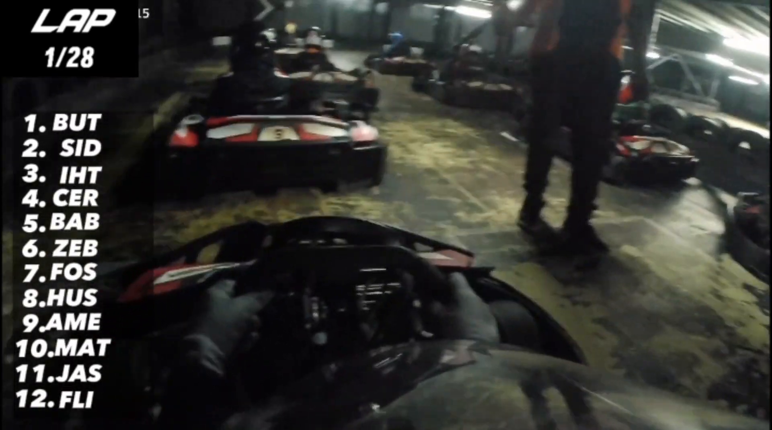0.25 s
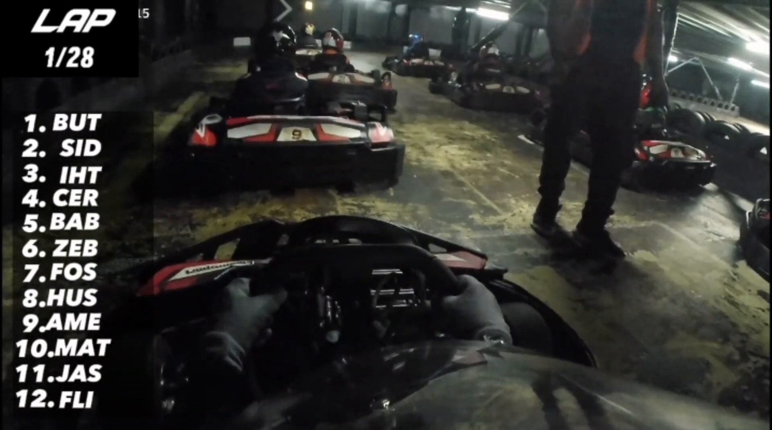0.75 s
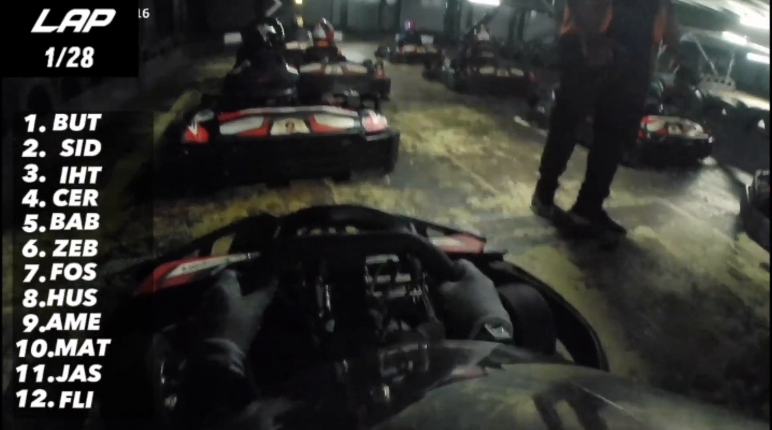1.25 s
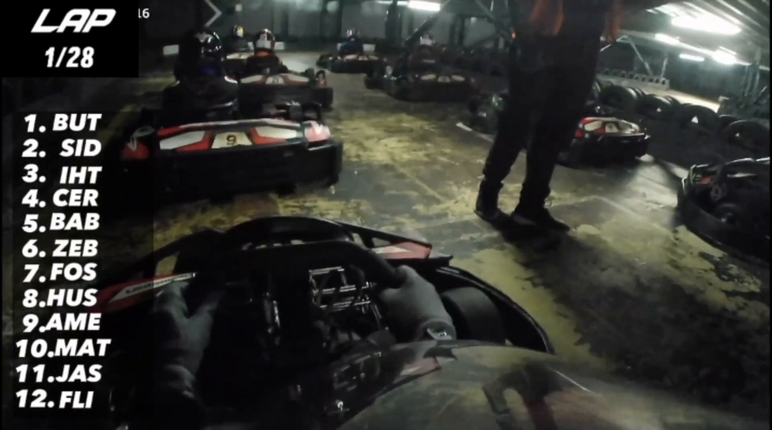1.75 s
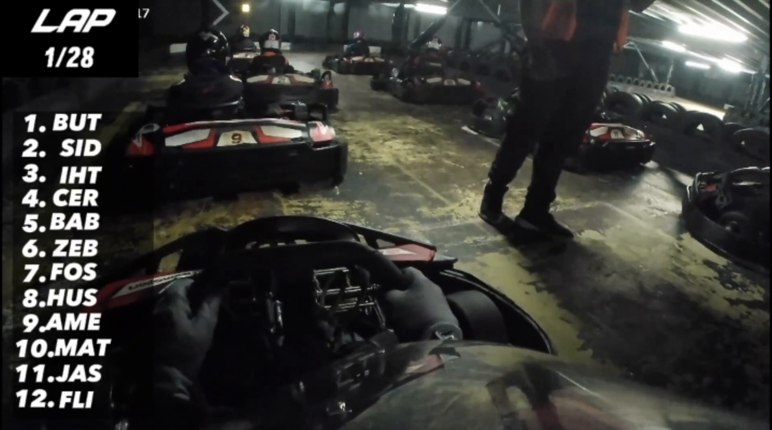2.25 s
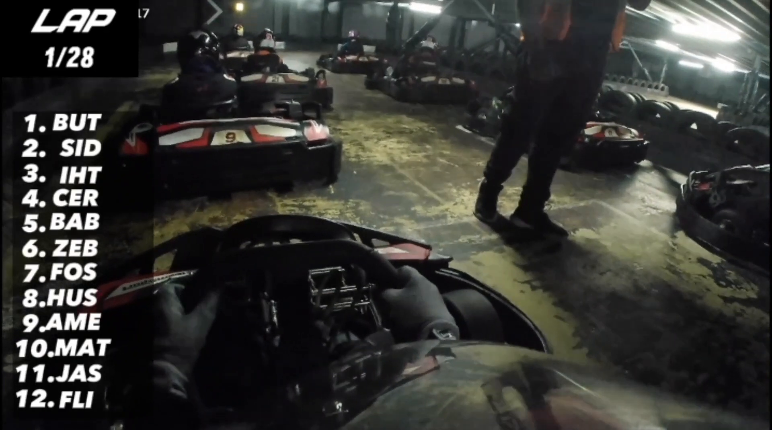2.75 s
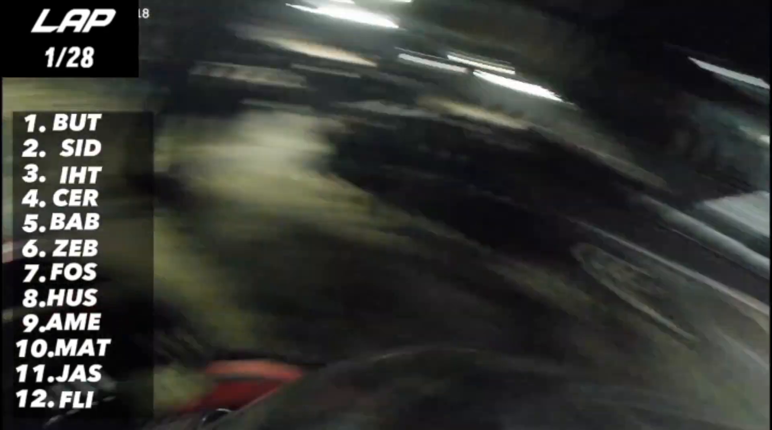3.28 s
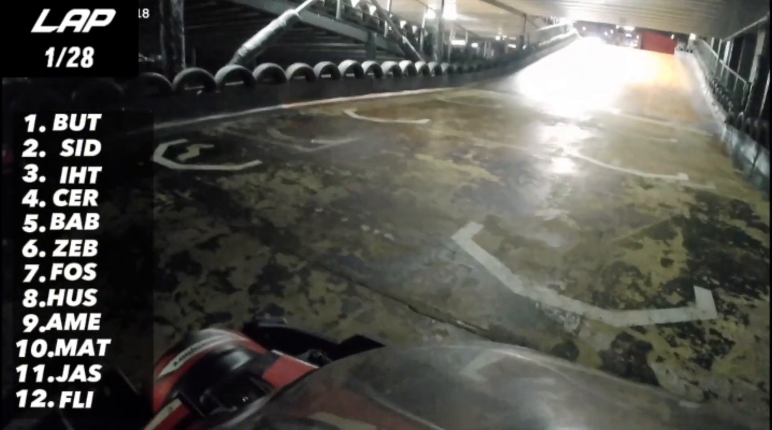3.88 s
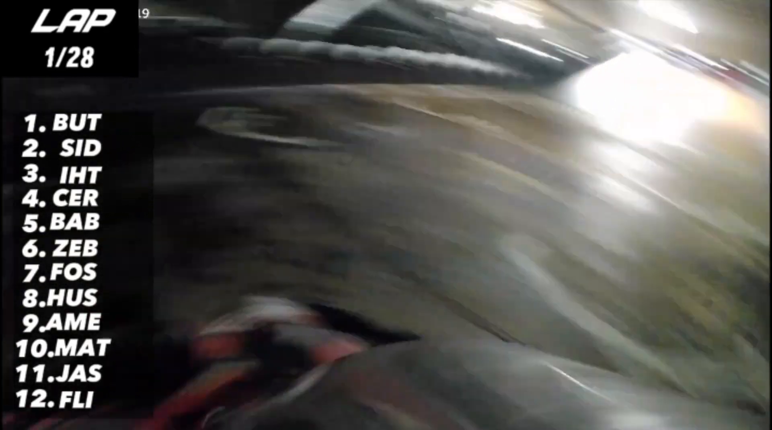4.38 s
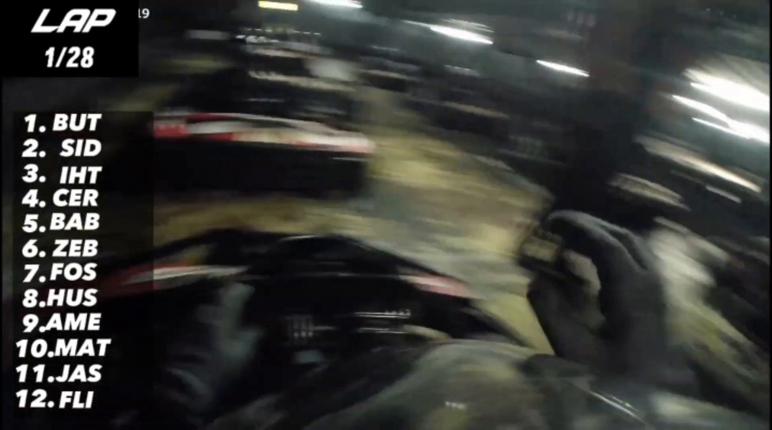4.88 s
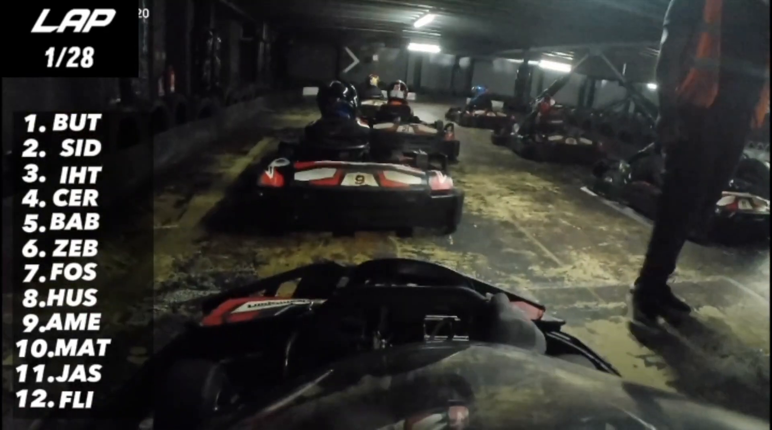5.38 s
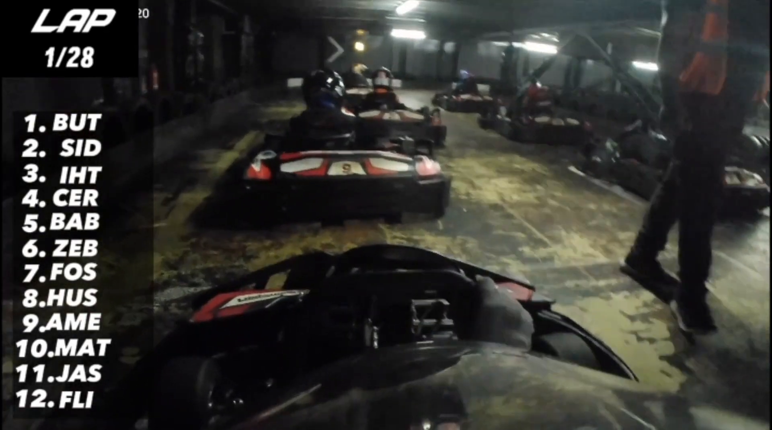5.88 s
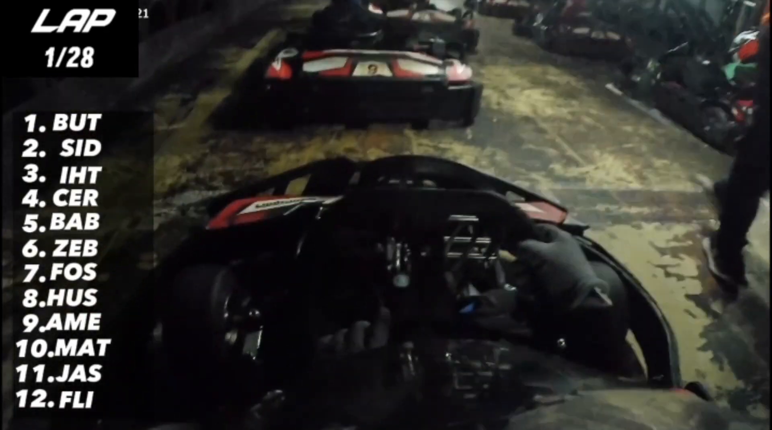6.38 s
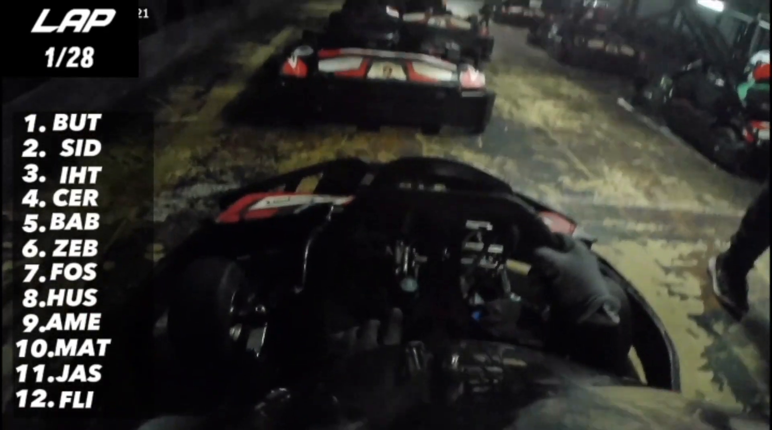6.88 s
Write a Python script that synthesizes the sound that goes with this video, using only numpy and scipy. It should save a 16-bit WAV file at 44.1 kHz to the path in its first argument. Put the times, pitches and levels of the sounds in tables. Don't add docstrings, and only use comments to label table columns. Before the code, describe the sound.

A dense, unbroken low engine drone runs from start to end: close kart exhausts puttering at slightly different idle speeds, farther ones smeared into hall reverberation. Low-mid gassy roar pulses with the firings. Small bright clicks and short tinny rattles appear irregularly, then a tiny high squeak just before halfway. The little helmet microphone is overdriven, making the rumble flattened and crunchy, while the treble is thin, patchy and compressed.

```python
import sys
import numpy as np
from scipy import signal
from scipy.fft import rfft, irfft, next_fast_len
from scipy.io import wavfile
from scipy.ndimage import uniform_filter1d

SR = 44100
rng = np.random.default_rng(int(sys.argv[2]) if len(sys.argv) > 2 else 0)


def decibels_to_gain(level_db):
    exponent = np.asarray(level_db, float) / 20
    return 10 ** exponent


def dump(signal):
    limited = np.clip(np.atleast_2d(signal).T, -1, 1)
    pcm = np.round(limited * 32767).astype(np.int16)
    wavfile.write(sys.argv[1], SR, pcm)


N = 314433


def evened(x):
    return x / np.sqrt(np.mean(x ** 2) + 1e-20)


def read(points, hz):
    f, value = np.transpose(points)
    return np.interp(np.log(hz + 1), np.log(f + 1), value)


def curve(rows):
    time_s, value = np.transpose(rows)
    return np.interp(np.arange(N) / SR, time_s, value)


def colour(x, points):
    pad = 4096
    size = next_fast_len(N + 2 * pad)
    gain = decibels_to_gain(read(points, np.fft.rfftfreq(size, 1 / SR)))
    wide = np.pad(x, pad, mode="reflect")
    return irfft(rfft(wide, size) * gain, size)[pad:][:N]


def high_pass(x, corner_hz):
    return signal.lfilter([1, -1], [1, -np.exp(-2 * np.pi * corner_hz / SR)], x)


def drift(per_s):
    knots = signal.lfilter([1], [1, -.5], rng.standard_normal(400))
    return np.interp(np.arange(N) / SR * np.clip(per_s, .1, 50), np.arange(400), evened(knots))


def firings(rate_hz, jitter):
    return np.cumsum(rate_hz * (1 + jitter * drift(15))) / SR + rng.random()


def exhaust(turns, orders, waver_db):
    out = np.zeros(N)
    for order, level_db in orders:
        level = np.sqrt(2) * decibels_to_gain(level_db + waver_db * np.minimum(drift(11), 1))
        out += level * np.cos(2 * np.pi * (order * turns + rng.random()))
    return out


def near_exhausts(rates_hz, turns):
    # order (multiple of firing rate), level_db
    own_orders = [(2, -34.5), (4, -33), (9, -34), (10, -27), (11, -29.5), (12, -31.5), (13, -24), (14, -32),
                  (15, -26.5), (16, -30.5), (17, -34.5), (19, -40.5)]
    ahead_orders = [(3, -33), (4, -26.5), (5, -25), (6, -29), (7, -33), (8, -34), (9, -37), (10, -28.5),
                    (11, -23.5), (12, -30.5)]
    beside_orders = [(1.5, -34), (5, -27), (6, -27.5), (7, -33.5), (8, -35), (9, -30), (10, -24),
                     (11, -29.5)]
    # level_db, slope_db_per_hz (above mean rate)
    load = [
        (0, 16.5),
        (0, 0),
        (0, 8),
    ]
    out = np.zeros(N)
    all_orders = (own_orders, ahead_orders, beside_orders)
    for rate_hz, turn, orders, (level_db, slope_db) in zip(rates_hz, turns, all_orders, load):
        gain = decibels_to_gain(level_db + slope_db * (rate_hz - rate_hz.mean()))
        out += gain * exhaust(turn, orders, waver_db=3.5)
    return out


def bangs(turns, spread_db):
    strength = decibels_to_gain(spread_db * rng.standard_normal(200))
    fires = np.diff(np.floor(turns), prepend=0) > 0
    return fires * strength[turns.astype(int)]


def hall(x, swaps_per_s, count=8):
    # freq_hz, t60_s
    t60 = [(60, 1.7), (500, 1.8), (4000, 0.69)]
    hz, t, z = signal.stft(rng.standard_normal((count, 2 * SR)), SR, nperseg=512)
    tails = signal.istft(z * decibels_to_gain(-60 * t / read(t60, hz)[:, None]), SR, nperseg=512)[1]
    wait = (swaps_per_s * np.arange(N) / SR - np.arange(count)[:, None]) % count - count / 2
    turn = np.cos(np.pi / 2 * np.clip(wait, -1, 1))
    size = next_fast_len(N)
    wet = irfft(rfft(x, size) * rfft(tails, size), size)[:, :N]
    return evened((turn * wet).sum(0))


def grid_drone():
    # firing_rate_hz, level_db
    far_engines = [(11.7, -6.5), (12.9, 4.5), (13.4, -0.5), (16, -2), (17.4, -1), (15.1, -3), (10.4, -4.5)]
    # freq_hz, density_db_per_hz
    muffler = [(8, -12.5), (20, -9.5), (45, -8), (65, -8.5), (103, -8.5), (128, -2.5), (155, 1),
               (185, -7.5), (240, -18), (400, -32.5), (1200, -76.5), (4000, -120)]
    thumps = np.zeros(N)
    for rate_hz, level_db in far_engines:
        turns = firings(rate_hz * (1 + .012 * drift(1.2)), jitter=.02)
        thumps += decibels_to_gain(level_db) * bangs(turns, spread_db=3)
    blurred = hall(thumps, swaps_per_s=2.2) + .45 * rng.standard_normal(N)
    return decibels_to_gain(-19.5) * evened(colour(blurred, muffler))


def puffs(turns, decay, base):
    return (base + np.exp(-(turns % 1) / decay)) * rng.standard_normal(N)


def gas_roar(turns):
    # freq_hz, density_db_per_hz
    roar_spectrum = [(100, -24), (250, -1.5), (480, 1), (900, -5), (1480, -10), (1800, -15.5), (2050, -22),
                     (3000, -28.5), (4500, -33.5), (7000, -54.5), (10000, -58), (15000, -68)]
    close = np.zeros(N)
    for turn, level_db in zip(turns, (-7, 1.5, -8)):
        close += decibels_to_gain(level_db) * puffs(turn, decay=.33, base=.44)
    mixed = evened(close) + 1.27 * hall(close, swaps_per_s=9)
    return decibels_to_gain(-24.03) * evened(colour(mixed, roar_spectrum))


def ticks():
    # start_s, peak_db
    tick_events = [(0.0478, -41), (0.2614, -48), (0.3636, -51), (0.7677, -47), (0.8166, -45), (0.9847, -50),
                   (1.0126, -50), (1.0461, -47), (1.088, -47), (1.3259, -46), (1.9081, -43), (2.1406, -47),
                   (2.2224, -43), (2.4888, -47), (2.6534, -45), (2.6908, -47), (2.7467, -45), (3.0261, -42),
                   (3.0755, -43), (3.1009, -46), (3.1916, -49), (3.2755, -47), (3.8522, -48), (3.9475, -44),
                   (4.174, -49), (4.2278, -39), (4.2478, -43), (4.3156, -46), (4.4394, -45), (4.9078, -47),
                   (5.0874, -46), (5.1872, -50), (5.3603, -44), (5.6187, -50), (5.7266, -46), (5.7798, -49),
                   (5.8277, -47), (5.9205, -47), (6.0911, -47), (6.3535, -45), (6.571, -46), (6.7451, -47),
                   (6.8938, -41), (7.023, -46)]
    # freq_hz, level_db
    tick_spectrum = [(1000, -20), (2500, 0), (5000, -3), (15000, -12)]
    gain_db, decay_s, ring_hz = 8, .0006, 900
    train, t = np.zeros(N), np.arange(256) / SR
    for start_s, peak_db in tick_events:
        train[round(start_s * SR)] = decibels_to_gain(peak_db + gain_db)
    snap = np.exp(-t / decay_s) * np.cos(2 * np.pi * ring_hz * t)
    return colour(signal.oaconvolve(train, snap)[:N], tick_spectrum)


def rattles():
    # start_s, level_db, centre_hz, width_hz, length_s
    rattle_events = [(.816, -46, 4900, 1800, .005), (.821, -47, 4700, 1600, .004),
                     (.826, -46, 4800, 1400, .007), (.842, -58, 7000, 9000, .01),
                     (3.77, -63, 7000, 9000, .03), (3.94, -62, 6500, 7000, .025),
                     (.725, -63, 7000, 8000, .02), (6.885, -59, 7000, 9000, .025),
                     (1.905, -60, 8000, 11000, .02), (1.94, -62, 7000, 9000, .03),
                     (2.14, -63, 7000, 9000, .035), (4.31, -61, 6000, 7000, .025)]
    out = np.zeros(N)
    for start_s, level_db, centre_hz, width_hz, length_s in rattle_events:
        edges_hz = [centre_hz - width_hz / 2, centre_hz + width_hz / 2]
        band = signal.butter(2, edges_hz, "bandpass", fs=SR, output="sos")
        settled = signal.sosfilt(band, rng.standard_normal(8000))[4000:]
        ring = evened(settled)[:round(length_s * SR)]
        out[round(start_s * SR):][:len(ring)] += decibels_to_gain(level_db) * ring * signal.windows.tukey(len(ring), .4)
    return out


def squeaks():
    # start_s, level_db, start_hz, end_hz, length_s
    squeak_events = [
        (3.266, -55, 6640, 6760, .04),
        (3.31, -63, 6650, 6650, .025),
    ]
    out = np.zeros(N)
    for start_s, level_db, start_hz, end_hz, length_s in squeak_events:
        hz = np.linspace(start_hz, end_hz, round(length_s * SR))
        flutter = 1 + .3 * np.sin(2 * np.pi * 110 * np.arange(len(hz)) / SR)
        envelope = np.sqrt(2) * decibels_to_gain(level_db) * flutter * np.hanning(len(hz)) ** .5
        out[round(start_s * SR):][:len(hz)] += envelope * np.sin(2 * np.pi * np.cumsum(hz) / SR)
    return out


def scene():
    # time_s, firing_rate_hz
    own_idle = [(0, 14.58), (.4, 14.74), (1.35, 14.84), (2.05, 14.67), (2.8, 14.72), (3.4, 14.86),
                (4.03, 14.69), (4.34, 14.77), (5.27, 14.67), (6.5, 14.83), (7.13, 14.72)]
    ahead_idle = [(0, 14.31), (.62, 14.48), (1.6, 14.14), (2.17, 14.23), (2.55, 14.11), (3.3, 14.32),
                  (4.34, 14.04), (5.1, 13.93), (6.2, 14.0), (7.13, 14.22)]
    beside_idle = [(0, 15.33), (.7, 15.55), (1.24, 15.58), (1.55, 15.52), (2.1, 15.65), (3.1, 15.56),
                   (3.72, 15.48), (4.3, 15.77), (4.7, 15.4), (5.05, 15.33), (6.55, 15.62), (7.13, 15.39)]
    rates_hz = [curve(rows) for rows in (own_idle, ahead_idle, beside_idle)]
    turns = [firings(rate_hz, jitter=.003012) for rate_hz in rates_hz]
    tones = near_exhausts(rates_hz, turns)
    swell = decibels_to_gain(.14 * drift(per_s=1.1))
    return (decibels_to_gain(-2) * tones + swell * (grid_drone() + gas_roar(turns)))[None]


def overloaded(dry):
    drive_db, rail, knee, ceiling = .4, .23, 30, .238
    hot = decibels_to_gain(drive_db) * dry
    capsule = hot / (1 + abs(hot / rail) ** knee) ** (1 / knee)
    sagged = high_pass(capsule, 16)
    return high_pass(np.clip(sagged, -ceiling, ceiling), 2.5)


def coarse_lines(x, size=1024):
    # freq_hz, step_db
    coarse = [(300, -18), (2000, -9), (3600, -2), (4500, 6.5), (6000, 9), (8000, 9.5), (15000, 9)]
    patchy_db = .8
    n, k = np.arange(2 * size) + .5, np.arange(size) + .5
    window = np.sin(np.pi * n / (2 * size))[:, None]
    basis = window * np.cos(np.pi / size * np.outer(n + size / 2, k)) * np.sqrt(2 / size)
    blocks = np.pad(x, (size, 2 * size - N % size), mode="reflect").reshape(-1, size)
    lines = np.hstack([blocks[:-1], blocks[1:]]) @ basis
    level = np.sqrt(uniform_filter1d(lines ** 2, size=28, axis=1) + 1e-18)
    patches_db = patchy_db * rng.standard_normal((len(lines), size // 32)).repeat(32, axis=1)
    step = level * decibels_to_gain(read(coarse, k * SR / (2 * size)) + patches_db)
    rounded = np.sign(lines) * np.floor(abs(lines) / step + .4) * step
    frames = rounded @ basis.T
    return (frames[:-1, size:] + frames[1:, :size]).ravel()[:N]


def top_cut(x):
    return signal.sosfilt(signal.butter(12, 15720, fs=SR, output="sos"), x)


def record(dry):
    # freq_hz, gain_db
    lift = [(4500, 0), (6500, 3), (10000, 4), (15500, 7.5)]
    leak, hiss_db, end_fade_s = .2, -92, .004
    lifted = colour(overloaded(dry)[0] + ticks() + rattles() + squeaks(), lift)
    detail = (1 - leak) * coarse_lines(lifted) + leak * lifted
    mix = detail[None] + decibels_to_gain(hiss_db) * rng.standard_normal(N)
    mix = mix * np.clip((N - np.arange(N)) / SR / end_fade_s, .3, 1)
    return top_cut(mix)


dry = scene()
out = record(dry)
dump(out)
```